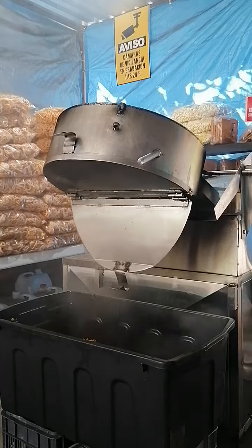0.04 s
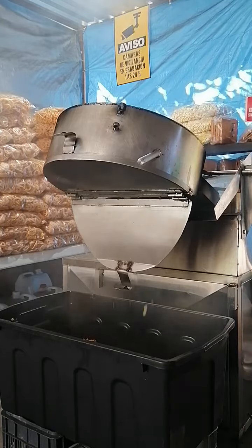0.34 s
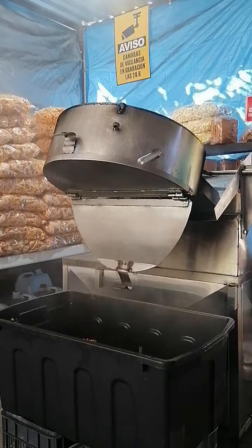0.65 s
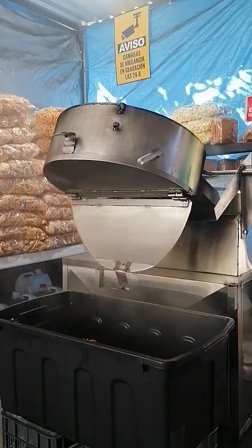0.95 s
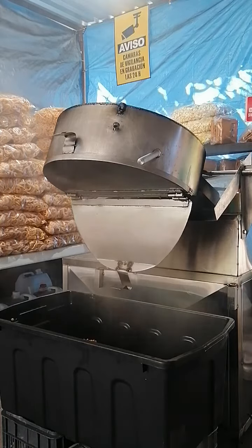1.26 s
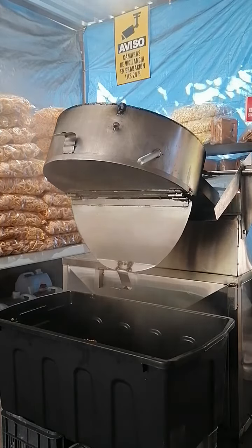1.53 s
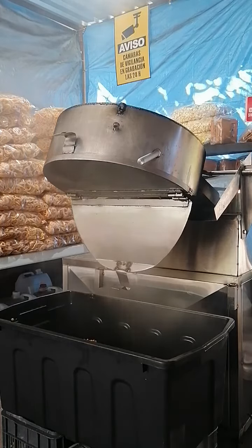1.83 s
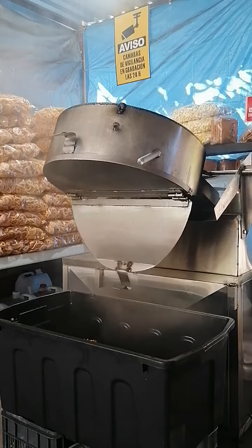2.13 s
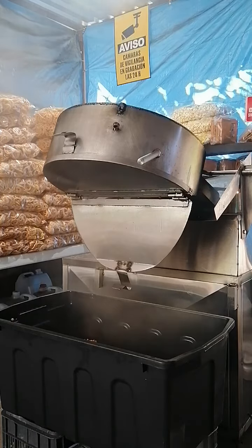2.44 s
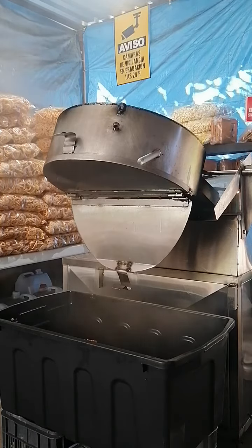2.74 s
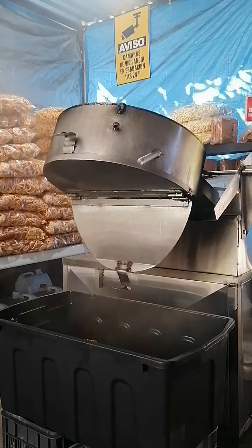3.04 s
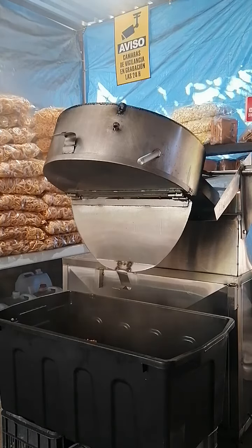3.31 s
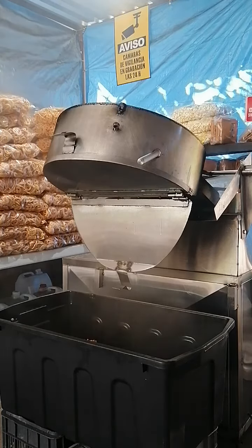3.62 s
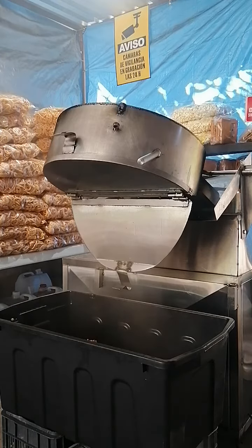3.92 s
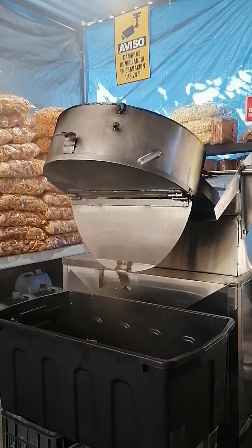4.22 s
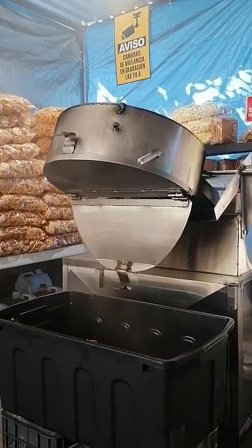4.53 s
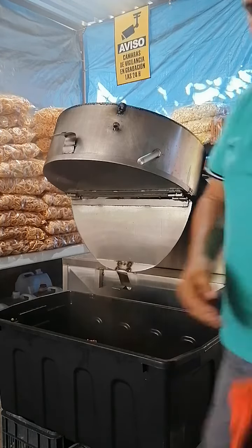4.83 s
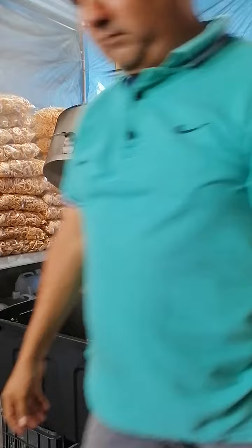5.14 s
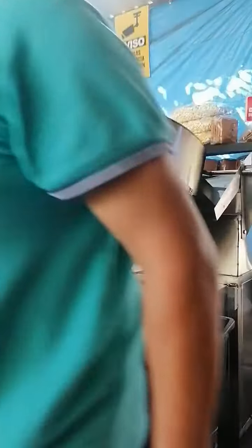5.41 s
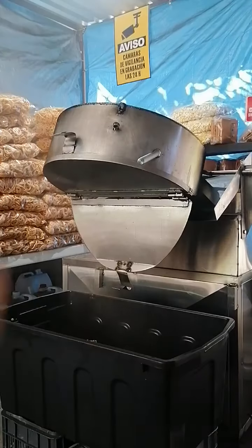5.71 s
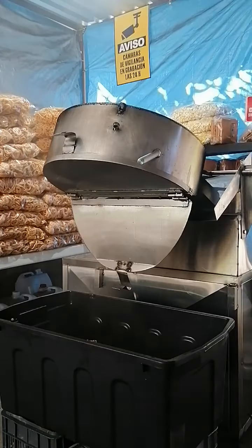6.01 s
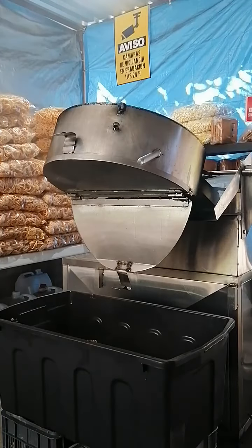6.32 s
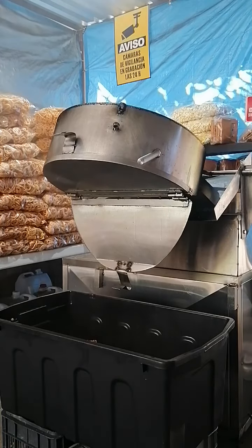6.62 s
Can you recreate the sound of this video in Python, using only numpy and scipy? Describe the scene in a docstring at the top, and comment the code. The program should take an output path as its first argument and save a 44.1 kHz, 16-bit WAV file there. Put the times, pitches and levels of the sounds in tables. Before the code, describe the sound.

A big steel popcorn kettle runs close to the microphone, its burner draught making an airy roar over a low motor hum and flame rumble. From about 0.8 seconds the draught fades, the hiss going first, with a faint hoot near 1.1 seconds and two small spurts of hiss around 1.5 and 1.9. By 2 seconds little but hum and rumble is left. At about 2.2 seconds a louder jet of air starts abruptly and builds within a quarter second, while the hum and rumble suddenly turn quieter. The jet rushes and hisses with slight surges, whining on four unsteady whistles, two mid-pitched and two high. The highest pulses shrilly between 2.4 and 4.1 seconds and again after 6. A very brief squeal comes at 3.6 seconds, and a lower whistle swells near 4.8. The jet continues until the end, at about 6.7 seconds.

```python
"""In a tarpaulin stall, a big steel popcorn kettle runs. The turbulent draught of its burner roars through the
housing and is throttled until little but the motor's hum and the flame's rumble is left. Then a valve opens: a
louder jet of air rushes through the ducting, exciting its narrow resonances and whining on four unsteady
whistles. At 2.17 s, just as the loud hiss starts, the low hum and rumble drop abruptly. One narrow-band
microphone stands close by."""
import sys
import numpy as np
from scipy import signal
from scipy.fft import rfft, irfft
from scipy.io import wavfile

SR = 44100
rng = np.random.default_rng(int(sys.argv[2]) if len(sys.argv) > 2 else 0)


def wav_record(signal):
    """Record a signal, one row per channel, as 16-bit PCM in the file named by sys.argv[1]."""
    frames = np.transpose(np.atleast_2d(signal))
    bounded = np.clip(frames, -1, 1)
    # unit amplitude maps onto the largest positive 16-bit level
    quanta = np.round(bounded * 32767).astype(np.int16)
    wavfile.write(sys.argv[1], SR, quanta)


N = 293706
T = np.arange(N) / SR
HZ = np.maximum(np.arange(N // 2 + 1) * SR / N, 1)
VALVE_OPENS_S, VALVE_TRAVEL_S = 2.168, 0.01
JET_START_DB, JET_BUILD_S = -8.5, 0.24
DROP_AT_S, DROP_LENGTH_S = 2.168, 0.01
LOW_CUT_HZ, CUTOFF_HZ = 45, 7080

# Broadband spectrum of the jet: (frequency [Hz], relative level [dB])
JET_SPECTRUM = [(150, -90), (300, -79.5), (370, -83.0), (430, -66.5), (800, -65), (1100, -63),
                (1200, -76.5), (1500, -75.5), (1820, -73), (1960, -70), (2750, -62.5), (3450, -69),
                (3750, -74.5), (7000, -92.5)]
# Resonances of the ducting: (frequency [Hz], bandwidth [Hz], relative peak level [dB])
DUCT_MODES = [(328, 18, -72.0), (482, 15, -63.5), (664, 8, -62.5), (722, 7, -62.0), (832, 15, -56.0),
              (912, 15, -55.5), (953, 29, -56.0), (1091, 10, -59.5), (1273, 9, -68.0), (1450, 7, -66.0),
              (1556, 33, -64.5), (1717, 26, -64.5), (1763, 7, -59.5), (1898, 33, -61.5), (1988, 27, -57.5),
              (2075, 75, -61.0), (2223, 17, -62.0), (2410, 6, -61.0), (2657, 22, -56.0), (2877, 31, -59.5),
              (3349, 33, -63.0), (3480, 26, -65.0), (3946, 28, -70.0), (4074, 20, -67.5), (4446, 60, -69.5),
              (4813, 21, -64.5), (4916, 506, -70.0), (5373, 364, -65.5), (5877, 409, -68.5),
              (6638, 434, -67.0)]
# The jet overshoots, settles and sways: (time [s], rush level [dB], hiss level [dB])
JET_FLOW = [(2.42, -28.5, -31.5), (2.68, -28.5, -33.5), (2.86, -28.5, -31.5), (2.99, -31, -32.5),
            (3.52, -29.5, -33.5), (3.76, -32, -35), (3.94, -28.5, -35.5), (4.15, -30.5, -36.8),
            (4.48, -29, -35), (4.72, -31.5, -36.5), (5.14, -30, -34.5), (5.33, -31, -35.5),
            (5.48, -30.5, -34.5), (6.66, -31, -34.5)]
# Momentary gulps and surges of the jet: (time [s], change in rush level [dB])
JET_SURGES = [(2.94, -1.5), (3.17, 1.5), (3.63, -1.5), (3.7, 1), (4.53, 1.5), (5.39, -3), (5.81, -0.5),
              (5.86, 2.5)]
# Whistles of the duct: (frequency [Hz], resting level [dB], pitch wander [Hz], waver [dB])
WHISTLES = [(971, -42.8, 3.5, 1.3), (1070, -46.2, 3, 1.2), (2717, -47, 5, 2.2), (2939, -45.2, 7, 2.2)]
# One whistle catches and swells: (time [s], half-width [s], frequency [Hz], level [dB])
WHISTLE_SWELLS = [(2.335, 0.046, 971, -32.5), (2.464, .06, 971, -36), (3.458, 0.051, 971, -36.5),
                  (4.643, 0.098, 971, -35), (4.857, .07, 971, -31), (5.62, 0.065, 971, -42),
                  (6.394, 0.044, 971, -42), (4.02, 0.11, 1070, -41), (4.6, 0.38, 1070, -44.5),
                  (5.288, .08, 1070, -38.5), (2.493, .1, 2717, -42.5), (2.802, 0.12, 2717, -39),
                  (4.527, 0.032, 2717, -37), (5.85, 0.019, 2717, -40), (6.29, .055, 2717, -35.5)]
# Short pulses of the highest whistle: (time [s], level [dB])
SHRILL_PULSES = [(2.365, -31), (2.41, -32), (2.595, -30), (2.63, -31.5), (2.71, -32.5), (2.81, -31),
                 (3.0, -37.5), (3.18, -34.5), (3.32, -30.5), (3.43, -30.5), (3.5, -41), (3.62, -30.5),
                 (3.88, -32), (4.1, -38), (6.1, -34), (6.42, -34.5), (6.58, -35)]
# Brief squeals of the jet: (time [s], half-width [s], frequency [Hz], level [dB])
SQUEALS = [(3.59, .011, 5390, -28), (3.589, .014, 6780, -33), (3.592, .012, 3180, -34)]
# Broadband spectrum of the draught: (frequency [Hz], relative level [dB])
DRAUGHT_SPECTRUM = [(100, -78.5), (260, -75), (400, -73.5), (520, -71), (720, -72.5), (1050, -70),
                    (1300, -79.5), (1680, -69.5), (2050, -73), (2350, -78.5), (2720, -73), (3700, -80.5),
                    (5600, -78.5), (6900, -74.5)]
# Resonances of the housing: (frequency [Hz], bandwidth [Hz], relative peak level [dB])
HOUSING_MODES = [(327, 31, -64.5), (449, 24, -61.5), (477, 21, -64.5), (528, 10, -69.0), (775, 15, -63.0),
                 (845, 20, -66.5), (954, 18, -64.5), (1048, 15, -62.5), (1436, 19, -65.5),
                 (1554, 12, -63.5), (1623, 57, -67.5), (1870, 25, -71.0), (2157, 14, -71.5),
                 (2606, 67, -69.5), (2883, 43, -70.5), (3387, 129, -74.5), (3989, 22, -72.0),
                 (4754, 90, -76.5)]
# Bands of the draught: (top edge [Hz], level [dB], fade start [s], fade end [s], fade depth [dB])
DRAUGHT_BANDS = [(520, -42, 1.47, 2.16, 15), (1430, -39.5, 1.29, 2.09, 22), (2230, -43, 1.1, 2.3, 36),
                 (3730, -44, 0.89, 2.05, 24.5), (8000, -39, 0.8, 1.98, 26)]
# Spurts of hiss as the draught closes: (time [s], half-width [s], level [dB])
SPURTS = [(1.48, .022, -46), (1.862, .022, -57)]
# Spectrum of the spurts: (frequency [Hz], relative level [dB])
SPURT_SPECTRUM = [(1500, -100), (2800, -75), (4200, -88), (5400, -79), (6000, -81), (6700, -76),
                  (7600, -82), (9000, -100)]
# Partials of the motor's hum: (frequency [Hz], relative level [dB])
HUM_PARTIALS = [(120, -6), (147, -2.5)]
# Drone of the motor in the housing: (frequency [Hz], level before the drop [dB], level after it [dB])
DRONE_PARTIALS = [(335.2, -58.5, -64), (422, -60, -74), (1057, -67, -76)]
# Spectrum of the flame's rumble: (frequency [Hz], relative level [dB])
FLAME_SPECTRUM = [(20, -100), (42, -90.5), (62, -74.5), (88, -70.5), (105, -76.5), (180, -74.5), (255, -87),
                  (400, -89), (1200, -108)]


def jet():
    """Turbulence excites the duct's modes; the low body starts weakest and builds with the flow."""
    rush_db, hiss_db = envelopes(JET_FLOW)
    body, rest = crossover(turbulence(JET_SPECTRUM, DUCT_MODES), edge_hz=794)
    throat, rest = crossover(rest, edge_hz=1230)
    rush, hiss = crossover(rest, edge_hz=4200)
    onset_db = jet_onset_db()
    surge_db = sum(change_db * swell(s, 0.014) for s, change_db in JET_SURGES)
    flow = noise_band(body, -40.5 + 1.9 * onset_db, flutter_db=0.4, rate_hz=10)
    flow += noise_band(throat, -36.5 + 0.55 * onset_db, flutter_db=1.26, rate_hz=6.3)
    flow += noise_band(rush, rush_db + 1.15 * onset_db + surge_db, flutter_db=0.5, rate_hz=14)
    flow += noise_band(hiss, hiss_db + 1.27 * onset_db + 1.1 * surge_db, flutter_db=0.7, rate_hz=30)
    return flow * valve() * from_db(0.36 * drift(25))


def whistles():
    """Lock-in: the jet sustains four duct resonances, which sound softly and take turns in swelling."""
    pitches = np.array([row[0] for row in WHISTLES])
    gains = [from_db(rest_db + 0.66 * jet_onset_db()) for _, rest_db, _, _ in WHISTLES]
    for s, half_width_s, hz, level_db in WHISTLE_SWELLS:
        nearest = np.argmin(abs(pitches - hz))
        gains[nearest] += from_db(level_db) * swell(s, half_width_s)
    gains[-1] += sum(from_db(level_db) * swell(s, 0.023) for s, level_db in SHRILL_PULSES)
    return valve() * sum(gain * tone(hz, wander_hz, rate_hz=20.45, waver_db=waver_db)
                         for (hz, _, wander_hz, waver_db), gain in zip(WHISTLES, gains))


def squeals():
    """Mode jumping: for an instant the jet sounds higher resonances."""
    return sum(from_db(db) * swell(s, half_width_s) * tone(hz, wander_hz=55, rate_hz=140, waver_db=2)
               for s, half_width_s, hz, db in SQUEALS)


def draught():
    """Turbulence excites the housing's modes; throttling chokes the hiss first and the deep body last."""
    flow, rest = 0, turbulence(DRAUGHT_SPECTRUM, HOUSING_MODES)
    for edge_hz, level_db, start_s, end_s, depth_db in DRAUGHT_BANDS:
        band, rest = crossover(rest, edge_hz) if edge_hz < CUTOFF_HZ else (rest, 0)
        band_db = level_db - depth_db * ease(start_s, end_s)
        flow += noise_band(band, band_db, flutter_db=0.6, rate_hz=45)
    # The closing draught hoots once on a resonance of the housing.
    hoot = from_db(-46) * swell(1.12, 0.098) * tone(772, wander_hz=4.2, rate_hz=14, waver_db=0.5)
    return (flow + hoot) * (1 - valve())


def spurts():
    """Flow noise in short, bright bursts of hiss."""
    hiss = rms_one(irfft(turbulence(SPURT_SPECTRUM), N))
    return hiss * sum(from_db(db) * swell(s, half_width_s) for s, half_width_s, db in SPURTS)


def motor():
    """A line spectrum: unsteady partials of hum and drone, whose level drops abruptly at 2.17 s, as the loud
    hiss starts."""
    dropped = level_drop()
    hum_db = -49.5 - 3 * throttle() - 11 * dropped
    hum = sum(from_db(db) * tone(hz, wander_hz=3, rate_hz=9, waver_db=3.5) for hz, db in HUM_PARTIALS)
    drone = 0
    for hz, before_db, after_db in DRONE_PARTIALS:
        drone_db = before_db + (after_db - before_db) * dropped
        drone += from_db(drone_db) * tone(hz, wander_hz=4, rate_hz=10, waver_db=2)
    return hum * from_db(hum_db) + drone


def flame():
    """Combustion noise: a rumble that grows with throttling; its level drops abruptly at 2.17 s, as the loud
    hiss starts."""
    rumble_db = -59 + 4.5 * throttle() - 13 * level_drop()
    return noise_band(turbulence(FLAME_SPECTRUM), rumble_db, flutter_db=1.7, rate_hz=25)


def valve():
    """Linear travel of the jet's valve, from shut (0) to open (1)."""
    return np.clip((T - VALVE_OPENS_S) / VALVE_TRAVEL_S, 0, 1)


def jet_onset_db():
    """Starting transient: the jet's level relative to full flow, rising to 0 dB."""
    return JET_START_DB * (1 - ease(VALVE_OPENS_S, VALVE_OPENS_S + JET_BUILD_S))


def throttle():
    """Throttling of the draught, from free (0) to choked (1)."""
    return ease(0.59, 2.2)


def level_drop():
    """A steep ramp from 0 to 1, over which hum, drone and rumble turn quieter."""
    return np.clip((T - DROP_AT_S) / DROP_LENGTH_S, 0, 1)


def turbulence(outline, modes=()):
    """Resonant filtering: a broad noise spectrum, rippled by many weak modes and peaked at strong ones."""
    hz, level_db = np.transpose(outline)
    ripple_db, spacing_hz = 3.5, 11
    weak_modes = rng.standard_normal(4096)
    ripple = ripple_db * np.interp(HZ / spacing_hz, np.arange(len(weak_modes)), weak_modes)
    power = from_db(np.interp(np.log(HZ), np.log(hz), level_db) + ripple) ** 2
    for centre_hz, width_hz, peak_db in modes:
        detuning = (HZ - centre_hz) / (0.75 * width_hz)
        power += from_db(peak_db) ** 2 / (1 + detuning ** 2) ** 2
    return rfft(rng.standard_normal(N)) * np.sqrt(power)


def crossover(spectrum, edge_hz):
    """Complementary filters: the parts of a spectrum below and above an edge."""
    below = 1 / (1 + (HZ / edge_hz) ** 12)
    return spectrum * below, spectrum * (1 - below)


def noise_band(spectrum, level_db, flutter_db, rate_hz):
    """Amplitude modulation by passing eddies, about a level set within the microphone's band."""
    heard = spectrum * (HZ < CUTOFF_HZ + 700)
    return rms_one(irfft(heard, N)) * from_db(level_db + flutter_db * drift(rate_hz))


def tone(hz, wander_hz, rate_hz, waver_db):
    """Random frequency and amplitude modulation of a sine, at unit power."""
    phase = 2 * np.pi * np.cumsum(hz + wander_hz * drift(rate_hz)) / SR
    return rms_one(np.sin(phase) * from_db(waver_db * drift(rate_hz)))


def drift(rate_hz):
    """Random fluctuation of unit power: noise low-passed at rate_hz."""
    count, step = 8192, 40
    hz = np.arange(count // 2 + 1) * SR / (step * count)
    slow = irfft(rfft(rng.standard_normal(count)) / (1 + (hz / rate_hz) ** 2), count)
    return rms_one(np.interp(np.arange(N) / step, np.arange(count), slow))


def swell(s, half_width_s):
    """Gaussian envelope of height 1 at time s; the half-width is its standard deviation."""
    return np.exp(-np.minimum(((T - s) / half_width_s) ** 2, 60) / 2)


def ease(start_s, end_s):
    """Raised-cosine step from 0 to 1."""
    progress = np.clip((T - start_s) / (end_s - start_s), 0, 1)
    return np.sin(progress * np.pi / 2) ** 2


def envelopes(rows):
    """Linear interpolation of each level column over time."""
    times, *columns = np.transpose(rows)
    return [np.interp(T, times, column) for column in columns]


def from_db(db):
    """Decibels to amplitude ratio."""
    return 10 ** (np.asarray(db) / 20)


def rms_one(x):
    """Normalisation to unit power."""
    return x / np.sqrt(np.mean(x ** 2) + 1e-20)


def scene():
    """Superposition of the kettle's sources, the same in both ears."""
    kettle = draught() + spurts() + jet() + whistles() + squeals() + motor() + flame()
    return np.array([kettle, kettle])


def record(dry):
    """Band limiting: the microphone thins the deepest bass and rolls off steeply at the top."""
    thinned = signal.sosfilt(signal.butter(2, LOW_CUT_HZ, "high", fs=SR, output="sos"), dry)
    rolled = signal.sosfilt(signal.butter(32, CUTOFF_HZ, fs=SR, output="sos"), thinned)
    return signal.sosfilt(signal.ellip(10, .1, 80, CUTOFF_HZ + 450, fs=SR, output="sos"), rolled)


dry = scene()
out = record(dry)
wav_record(out)
```